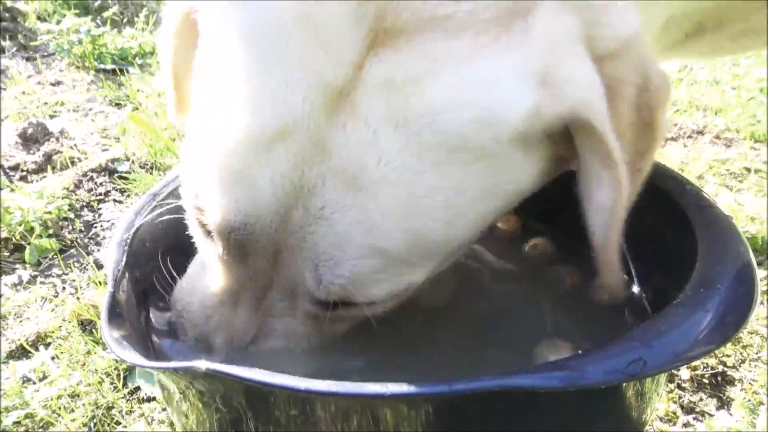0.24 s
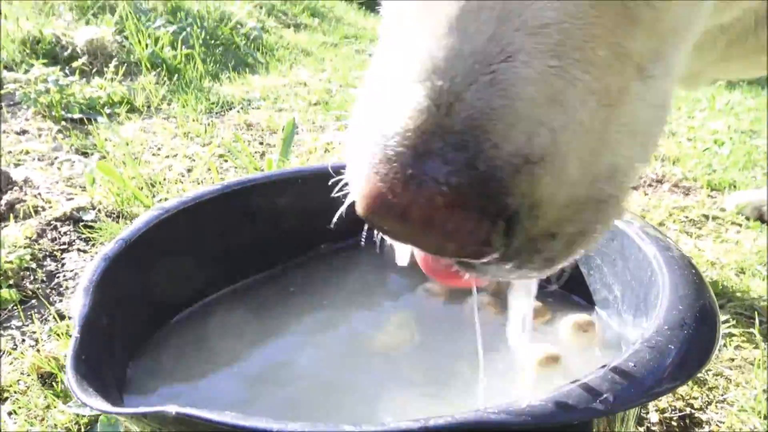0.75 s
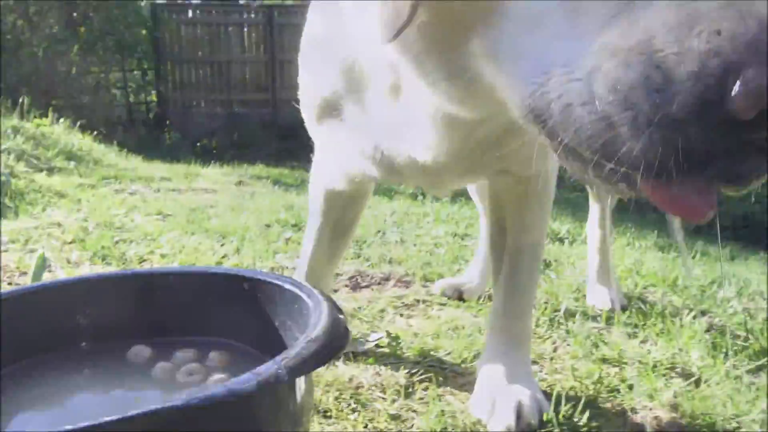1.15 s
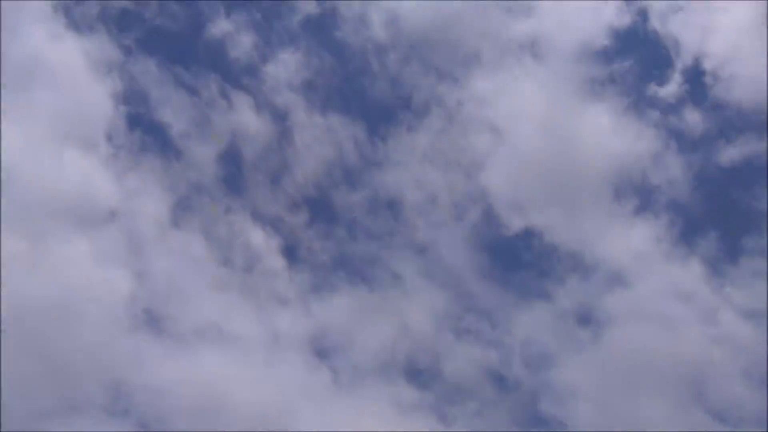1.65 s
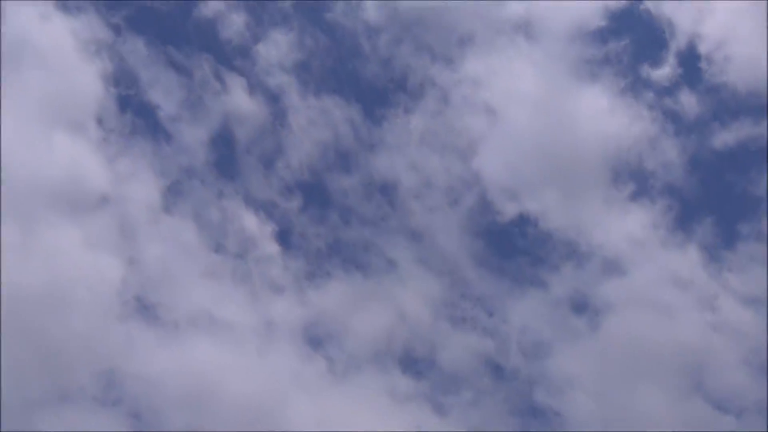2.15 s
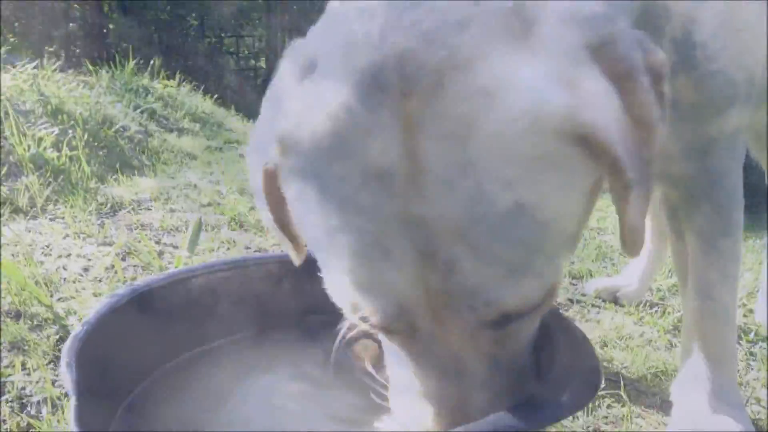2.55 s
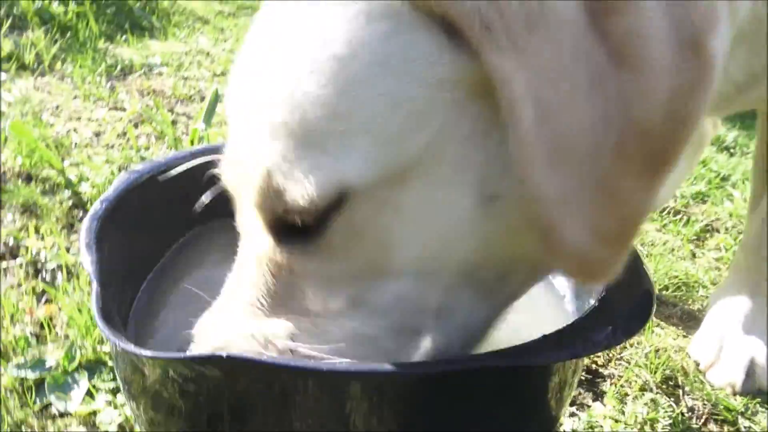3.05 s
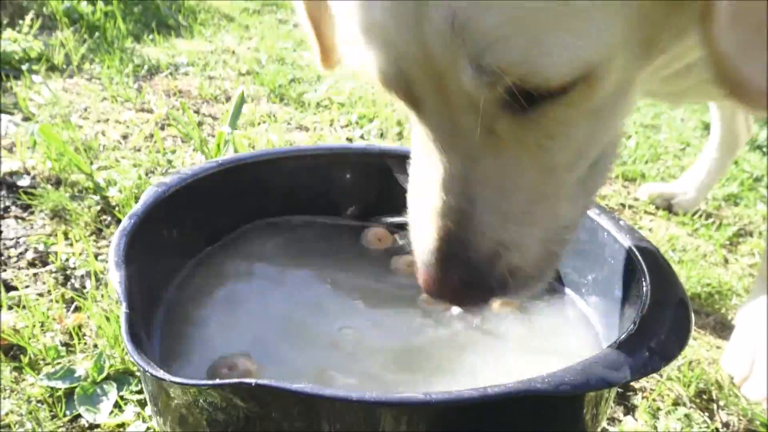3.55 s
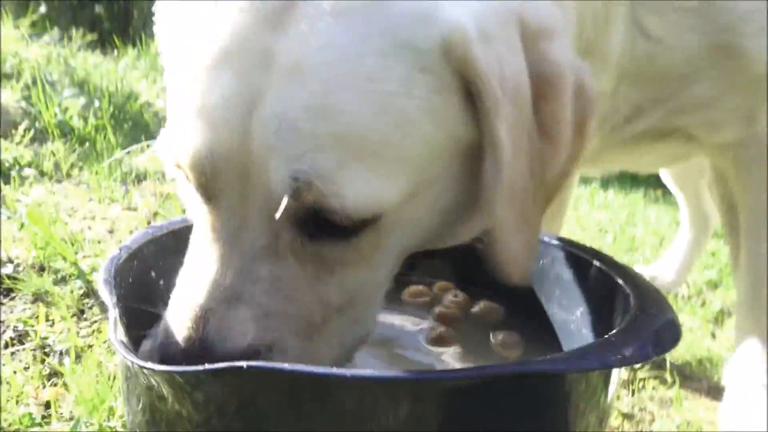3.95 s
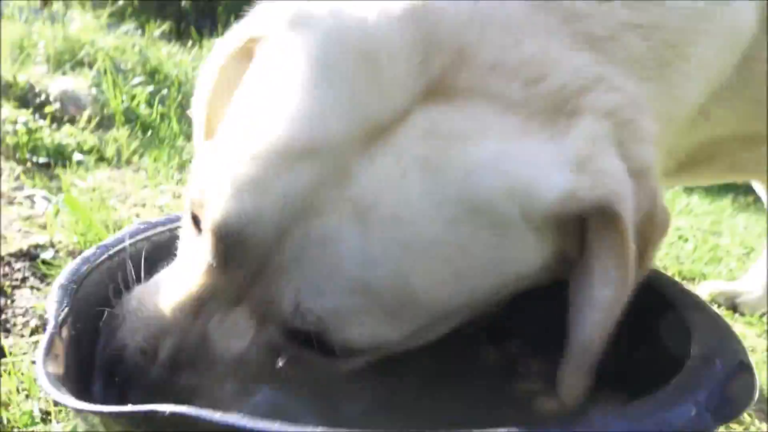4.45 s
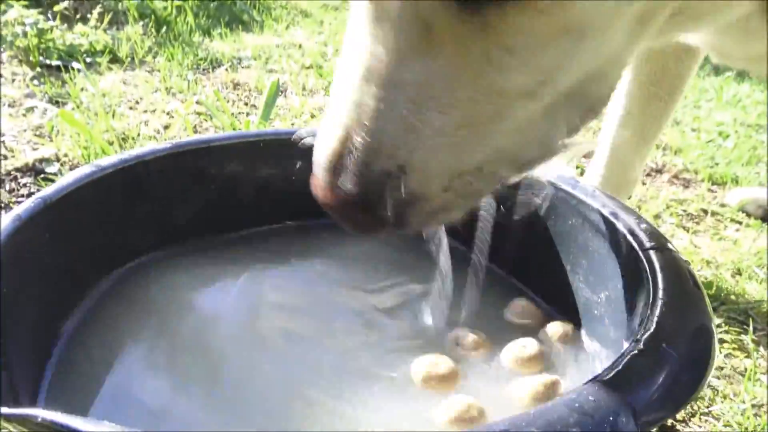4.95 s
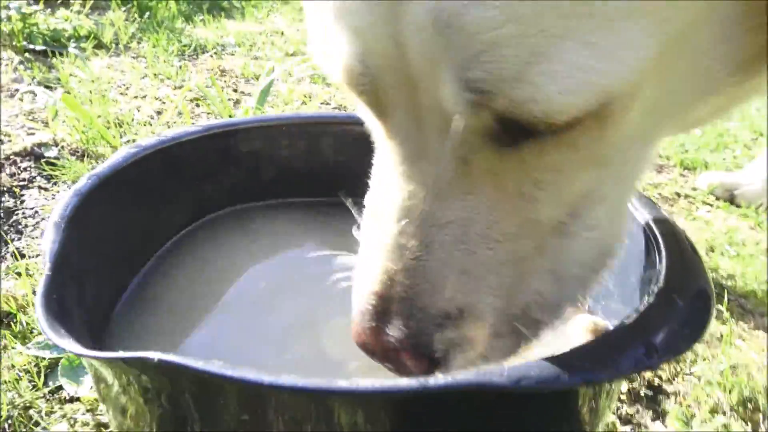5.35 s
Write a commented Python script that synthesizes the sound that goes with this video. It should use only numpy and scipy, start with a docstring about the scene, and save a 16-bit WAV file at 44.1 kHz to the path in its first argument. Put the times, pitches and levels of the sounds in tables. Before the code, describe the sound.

Fast sloppy dog lapping in a tub outdoors, bubbly splashes and bright drips, interrupted by a short dead-silent gap, faint birds behind.

```python
"""Quick wet laps, about seven a second: a dog laps and roots for floating treats in a plastic tub on a quiet lawn.
Each lap splashes as clouds of tiny bubbles and traps an air pocket that pings as a damped sine.
Drops ping as they fall back and squeezed air chirps upward; dull low thumps of wind or handling ring briefly.
Behind it are rumble, soft moving air and fizz as filtered noise, and faint high gliding bird whistles.
All sound stops for about 0.6 s partway through."""
import sys
import numpy as np
from scipy import signal
from scipy.fft import rfft, irfft, next_fast_len
from scipy.io import wavfile
from scipy.ndimage import uniform_filter1d, map_coordinates

SR = 44100
rng = np.random.default_rng(int(sys.argv[2]) if len(sys.argv) > 2 else 0)


def unload_wav(signal):
    """Save mono or channel-first audio to the path in sys.argv[1] as 16-bit WAV at rate SR, clipped to [-1, 1]."""
    wavfile.write(
        sys.argv[1],
        SR,
        np.round(np.clip(np.atleast_2d(signal).T, -1, 1) * 32767).astype(np.int16),
    )


N = 247401

# Laps: the tongue slaps the water and traps an air pocket, then the mouth smacks shut.
# Each row: start in seconds, nominal slap level in dB, spray share in dB (capped at 0), pocket start pitch in Hz,
# pocket peak in dB, pocket t60 in seconds, wait for the smack in seconds, nominal smack level in dB.
LAP_ROWS = [(0.0187, -45, 0.5, 2140, -22.5, 0.013, .019, -32),
            (.1345, -32.5, -5, 2214, -18.5, 0.013, 0.034, -33.5),
            (.278, -38.5, -2.5, 1640, -18, 0.003, 0.0058, -41.5),
            (0.351, -39.5, -4.5, 2240, -35, 0.0026, 0.014, -49),
            (.4705, -33, -4, 1850, -24, .012, 0.028, -40.5),
            (0.5857, -34.5, -1, 1670, -25, 0.016, 0.025, -44),
            (0.752, -40, -1, 3000, -59, 0.0035, 0.021, -40),
            (0.8753, -39, -3, 2450, -26, 0.0071, 0.017, -51),
            (1.0104, -38, -1, 1590, -18.5, 0.0035, 0.01, -40),
            (1.1476, -41.5, -2, 1750, -26, 0.0043, 0.022, -43),
            (1.28, -36.5, -3.5, 1910, -35, 0.024, 0.02, -48),
            (1.429, -46, -2.5, 3360, -28.5, 0.0045, .02, -52),
            (1.569, -43.5, -1, 3050, -34, 0.013, 0.03, -44.5),
            (1.705, -36.5, -2.5, 2814, -28, 0.0083, 0.021, -55.5),
            (2.3351, -41, -4.5, 2026, -14.5, 0.0087, 0.024, -52),
            (2.436, -42.5, -3, 1840, -30, 0.013, 0.065, -43.5),
            (2.563, -39, -0.5, 2840, -34, .005, 0.016, -39),
            (2.593, -37.5, -2.5, 1860, -28.5, 0.0076, 0.01, -34.5),
            (2.6827, -32.5, -2.5, 2240, -16, 0.0054, 0.032, -34),
            (2.812, -39, -1, 1900, -38, 0.011, .026, -35), (2.972, -36, -3, 2930, -32, .018, 0.027, -37.5),
            (3.114, -37, -5, 3430, -27, 0.0097, 0.023, -46.5),
            (3.146, -33, -3, 1510, -16.5, 0.004, 0.004, -58),
            (3.2476, -38, -5, 2560, -14.5, 0.0065, 0.027, -33.5),
            (3.384, -32.5, -5, 1600, -29.5, .012, 0.017, -41),
            (3.514, -34.5, -5.5, 1554, -28.5, 0.02, 0.017, -71),
            (3.643, -34.5, -3, 1850, -50, 0.0079, .052, -36),
            (3.822, -34.5, -3.5, 3100, -19.5, 0.0022, 0.0084, -45),
            (3.95, -37.5, -2.5, 2980, -27.5, 0.016, 0.045, -43),
            (4.1113, -39.5, -3, 1850, -30.5, .0064, .056, -52),
            (4.2247, -40, -10, 1560, -27.5, 0.015, 0.0403, -40),
            (4.348, -39, -14, 4120, -23.5, 0.0064, .047, -60),
            (4.416, -43, -0.5, 1690, -34, 0.014, 0.0027, -36.5),
            (4.505, -40, -2.5, 1920, -18, 0.0018, 0.016, -42.5),
            (4.6293, -41, -7, 5650, -13, 0.0011, 0.03, -32),
            (4.7361, -31.5, -2, 1700, -18.5, 0.0018, 0.035, -43),
            (4.86, -31.5, -2, 1820, -21, .008, 0.029, -40),
            (5.0223, -38, -2, 1600, -23.5, 0.007, 0.03, -32.5),
            (5.146, -34.5, -4, 1610, -21, 0.007, 0.028, -37.5),
            (5.215, -45, 1, 1840, -34, 0.014, 0.046, -47),
            (5.286, -41.5, -5.5, 1040, -31.5, 0.0082, 0.034, -38.5),
            (5.397, -40, 0, 2080, -38, 0.0073, 0.023, -38), (5.46, -36, -7.5, 2300, -33, .011, .023, -40.5),
            (5.519, -43, -2, 1740, -37, .03, 0.021, -41),
            (5.588, -39.5, -11, 3250, -26.5, .0033, 0.017, -49)]
SLAP_LAG_S = 0.00095  # the slap peaks just after the pocket closes


def amp(db):
    """Decibels to gain."""
    return 10 ** (np.asarray(db) / 20)


def unit(x):
    """Scale to rms 1."""
    return x / np.sqrt(np.mean(x ** 2) + 1e-20)


def add(track, start_s, sound):
    """Mix a sound into the track from start_s."""
    i = int(np.clip(round(start_s * SR), 0, N))
    track[i:i + len(sound)] += sound[:N - i]


def colour(x, points):
    """Filter by (Hz, dB) points joined on a log-frequency axis."""
    m = next_fast_len(N + SR // 4)
    hz, db = np.transpose(points)
    bin_hz = np.fft.rfftfreq(m, 1 / SR)
    gain = amp(np.interp(np.log(bin_hz + 1), np.log(hz), db))
    return irfft(rfft(x, m) * gain, m)[..., :N]


def noise(points):
    """Coloured noise of rms 1."""
    return unit(colour(rng.standard_normal(N), points))


def wander(knots_per_s, knots):
    """A smooth random curve through evenly spaced normal draws."""
    return map_coordinates(rng.standard_normal(knots), [np.arange(N) * knots_per_s / SR])


def droplets(rate_per_s, hz, octaves, cycles, scatter_db):
    """A dense cloud of tiny damped bubbles of random pitch and level, rms 1; each decays 60 dB in `cycles`."""
    count = int(rate_per_s * N / SR)
    when, pitch, size = rng.random((count, 3)).T
    bubble_hz = np.minimum(hz * 2 ** (octaves * (2 * pitch - 1)), .4 * SR)[:, None]
    k = np.arange(SR // 200)
    turns = bubble_hz * k / SR
    decay = np.exp(-np.log(1000) * turns / cycles)
    grains = amp(scatter_db * size)[:, None] * np.sin(2 * np.pi * turns) * decay
    index = (when * N).astype(int)[:, None] + k
    return unit(np.bincount(index.ravel(), grains.ravel(), N)[:N])


def ping(hz, t60_s, rise, onset_cycles):
    """A damped ring, envelope peak 1; its pitch climbs, as a bubble's does when it nears the surface."""
    t = np.arange(int(1.2 * t60_s * SR) + 8) / SR
    shape = amp(-60 * t / t60_s) * (1 - np.exp(-t * hz / onset_cycles))
    return shape / shape.max() * np.sin(2 * np.pi * hz * t * (1 + rise * t / t60_s))


def rings(rows, rise, onset_cycles):
    """Every row (s, Hz, dB, t60 s) is a damped ring: mostly high for bubbles, low for thumps."""
    out = np.zeros(N)
    for start_s, hz, db, t60_s in rows:
        add(out, start_s, amp(db) * ping(hz, t60_s, rise, onset_cycles))
    return out


def glide(length_s, start_hz, end_hz):
    """A short tone that swells and fades as its pitch slides."""
    n = int(length_s * SR)
    hz = np.geomspace(start_hz, end_hz, n)
    return np.sqrt(2 * np.hanning(n)) * np.sin(2 * np.pi * np.cumsum(hz) / SR)


def splashes():
    """Touch, slap and smack are short swells of small bubbles: a deep gurgle, a coarse slosh and a fine spray."""
    # Filter curves. Each row: frequency in Hz, gain in dB before scaling to rms 1.
    slosh_curve = [(300, -12.5), (700, -7), (1200, -12.5), (1750, 12.5), (3000, 11), (4500, 2.5),
                   (6500, -9), (12000, -36)]
    spray_curve = [(2500, -37), (4500, -10.5), (6600, -6), (8500, -6), (11000, -7), (15000, -7.5)]
    touch_lead_s, touch_s, touch_db = 0.0054, 0.0025, -7  # the tongue's tip touches first; level re slap
    slap_s, smack_s = 0.01, 0.0097  # swell time scales; slap_s holds at the typical ring
    typical_ring_s, stretch_power = 0.021, .1  # a longer-ringing lap splashes longer
    smack_spray_db = -1  # re the slap's spray share
    clumps_per_s, clump_db = 210, 2.5  # bubbles burst in uneven clumps
    deep, coarse, fine = np.zeros((3, N))
    for start_s, slap_db, spray_db, _, _, ring_s, wait_s, smack_db in LAP_ROWS:
        stretched_s = slap_s * (ring_s / typical_ring_s) ** stretch_power
        touch = (start_s - touch_lead_s, slap_db + touch_db, touch_s, spray_db)
        slap = (start_s + SLAP_LAG_S, slap_db, stretched_s, spray_db)
        smack = (start_s + wait_s, smack_db, smack_s, spray_db + smack_spray_db)
        for peak_s, db, length_s, treble_db in (touch, slap, smack):
            t = np.arange(-int(2 * length_s * SR), int(2 * length_s * SR)) / SR
            steepness = np.where(t < 0, 3.4, 2.6)  # swells faster than it dies
            power = amp(db) ** 2 / np.cosh(steepness * t / length_s) ** 2
            share = min(amp(treble_db) ** 2, 1)
            sunk = .5 / (1 + share / 0.014)  # little spray: more of the splash is under water, with larger bubbles
            add(deep, peak_s + t[0], power * sunk)
            add(coarse, peak_s + t[0], power * (1 - share) * (1 - sunk))
            add(fine, peak_s + t[0], power * share)
    gurgle = droplets(rate_per_s=1300, hz=1080, octaves=0.46, cycles=9.1, scatter_db=39)
    slosh_cloud = droplets(rate_per_s=3500, hz=1972, octaves=1.65, cycles=15, scatter_db=42)
    spray_cloud = droplets(rate_per_s=3000, hz=8000, octaves=1., cycles=24, scatter_db=36)
    slosh = unit(colour(slosh_cloud, slosh_curve))
    spray = unit(colour(spray_cloud, spray_curve))
    clumps = unit(amp(clump_db * wander(clumps_per_s, N // 20)))
    mix = amp(3.5) * np.sqrt(deep) * gurgle
    mix += amp(-0.6) * np.sqrt(coarse) * slosh
    mix += amp(0.43) * np.sqrt(fine) * spray
    return clumps * mix


def bubbles():
    """Each lap's air pocket, the smaller bubble that splits off it, loud drops and stray drips ring as damped sines."""
    # Loudest drops falling from the muzzle. Each row: start in seconds, start pitch in Hz, peak in dB.
    loud_drops = [(.0354, 2360, -23), (0.0394, 7640, -26), (.0396, 11700, -22), (.0417, 3300, -27.5),
                  (.1096, 2970, -28.5), (.137, 2310, -19.5), (.1389, 5570, -22), (.1713, 3080, -21),
                  (.183, 970, -30), (.1944, 1810, -27), (.2398, 2660, -26.5), (.2401, 6470, -23),
                  (.2835, 2530, -19.5), (0.2835, 12400, -29), (.3532, 7140, -25), (.4756, 4750, -23),
                  (.4773, 3070, -25.5), (0.5185, 7500, -29), (.55, 1780, -31), (.624, 7340, -30.5),
                  (.7581, 6200, -20.5), (.7725, 5750, -22), (1.1606, 2310, -29), (1.168, 2650, -35.5),
                  (1.281, 6050, -26.5), (1.297, 2580, -36.5), (1.432, 8530, -28), (1.5962, 2700, -29.5),
                  (2.3298, 6240, -26.5), (2.4852, 2570, -37), (2.5107, 3300, -28), (2.5814, 3850, -22),
                  (2.6021, 9540, -23), (2.6123, 3900, -27), (2.7066, 3930, -23), (2.711, 3600, -24.5),
                  (2.7732, 7040, -27.5), (2.8202, 4080, -25.5), (2.8416, 5370, -27.5), (2.862, 5100, -37.5),
                  (3.0255, 1750, -26.5), (3.0325, 6900, -24.5), (3.2466, 5770, -24), (3.252, 3400, -21),
                  (3.2778, 1520, -24.5), (3.2844, 890, -28.5), (3.2856, 4740, -23.5), (3.3053, 3400, -25),
                  (3.4533, 6830, -31), (3.8048, 2630, -37.5), (3.8825, 3800, -33.5), (4.0149, 5740, -35),
                  (4.1138, 4060, -18.5), (4.21, 3170, -34), (4.261, 1230, -34.5), (4.278, 4640, -31.5),
                  (4.365, 890, -36.5), (4.392, 1180, -44), (4.4944, 10400, -28.5), (4.5042, 3890, -23),
                  (4.5778, 2680, -37.5), (4.63, 4600, -24.5), (4.6453, 800, -29), (4.651, 1800, -27),
                  (4.6622, 6100, -23), (4.7331, 6360, -12.5), (4.744, 4800, -25.5), (4.7733, 7550, -32),
                  (4.8031, 7300, -26), (4.899, 1930, -33.5), (4.9668, 7260, -27), (5.0599, 1890, -23.5),
                  (5.0629, 12200, -28.5), (5.0985, 1600, -23.5), (5.2247, 4200, -29.5),
                  (5.2599, 1720, -21.5), (5.2915, 5900, -27.5), (5.3184, 2620, -29.5), (5.3854, 8000, -29),
                  (5.4245, 9000, -30), (5.4861, 2080, -19)]
    split_ratio, split_db, split_t60_s = 1.863, 5.5, 0.0032  # pitch re pocket, peak re slap level, ring
    drop_t60_s, drop_hz, shortening_power = 0.0062, 2000, .4  # ring at drop_hz; smaller bubbles ring shorter
    drips_per_s, drip_db, drip_scatter_db = 10, -44.5, 11
    drip_hz, drip_octaves = 4200, 1.12
    pockets = [(s, hz, db, t60_s) for s, _, _, hz, db, t60_s, _, _ in LAP_ROWS]
    splits = [(s + SLAP_LAG_S, hz * split_ratio, slap_db + split_db, split_t60_s)
              for s, slap_db, _, hz, *_ in LAP_ROWS]
    drips = []
    for when, pitch, size in rng.random((int(drips_per_s * N / SR), 3)):
        hz = drip_hz * 2 ** (drip_octaves * (2 * pitch - 1))
        drips.append((when * N / SR, hz, drip_db + drip_scatter_db * (2 * size - 1)))
    drops = [(s, hz, db, drop_t60_s * (drop_hz / hz) ** shortening_power)
             for s, hz, db in loud_drops + drips]
    return rings(pockets + splits + drops, rise=0.028, onset_cycles=1.0)


def squelches():
    """A shrinking pocket of air, squeezed out by the tongue, chirps steeply upward."""
    # Each row: start in seconds, length in seconds, start pitch in Hz, nominal level in dB.
    squelch_rows = [(.187, 0.015, 1710, -39.5), (0.4, .011, 967, -43), (.475, 0.013, 1280, -37),
                    (0.595, 0.021, 1296, -42), (1.029, 0.011, 4170, -39.5), (2.512, 0.0093, 3140, -41),
                    (2.642, 0.0089, 2800, -38.5), (2.698, 0.015, 3210, -34), (4.647, 0.015, 1537, -48),
                    (4.755, .0088, 3700, -51)]
    pitch_ratio = 1.55  # end over start
    out = np.zeros(N)
    for start_s, length_s, hz, db in squelch_rows:
        add(out, start_s, amp(db) * glide(length_s, hz, hz * pitch_ratio))
    return out


def fallback(splashing, settle_s):
    """Thrown water patters back: a droplet cloud follows the splash power with an exponential tail."""
    t = np.arange(SR // 4) / SR
    fade = np.exp(-t / settle_s)
    stirred = np.abs(signal.fftconvolve(splashing ** 2, fade / fade.sum())[:N])
    patter = droplets(rate_per_s=500, hz=4800, octaves=1.65, cycles=24, scatter_db=24)
    return np.sqrt(stirred) * unit(colour(patter, [(1500, -7), (4000, 3), (13000, 2.5)]))


def thumps():
    """Dull low thumps of wind or handling, as quickly damped rings."""
    # Each row: start in seconds, start pitch in Hz, peak in dB.
    thump_rows = [(0.041, 267, -28), (.175, 117.7, -33), (0.1831, 357, -34.5), (0.631, 252, -36),
                  (0.8128, 430, -33), (0.8408, 284, -36), (0.964, 224, -40), (1.3159, 403, -29.5),
                  (1.34, 283, -28.5), (1.3653, 280, -29), (1.3671, 570, -28.5), (1.4033, 334, -32),
                  (1.4105, 120, -34.5), (1.667, 276, -35), (2.694, 416, -30), (2.6989, 184, -31),
                  (5.2867, 540, -32.5)]
    t60_s = 0.013
    return rings([(s, hz, db, t60_s) for s, hz, db in thump_rows], rise=0.043, onset_cycles=0.69)


def short_echo(x, t60_s, delay_s):
    """The tub's walls and the ground return a short, dense echo: decaying noise as impulse response."""
    t = np.arange(SR // 8) / SR
    tail = rng.standard_normal(len(t)) * np.exp(-np.log(1000) * t / t60_s) * (t > delay_s)
    return signal.fftconvolve(x, tail / np.linalg.norm(tail))[:N]


def bird():
    """Thin gliding whistles, blurred by distance: slow noise modulates their level."""
    # Each row: start in seconds, length in seconds, start pitch in Hz, end pitch in Hz, nominal level in dB.
    whistle_rows = [(1.332, .07, 7150, 6800, -62), (1.44, 0.088, 8500, 7550, -60.5),
                    (1.623, 0.19, 5660, 6760, -56.5), (2.29, 0.33, 6870, 6600, -66),
                    (3.725, 0.11, 5140, 6160, -58), (3.798, 0.11, 7200, 7200, -59),
                    (4, 0.076, 8600, 8200, -60), (5.154, 0.052, 6900, 6520, -48.5),
                    (5.207, 0.1, 5340, 5960, -56.5), (5.275, 0.11, 7860, 7470, -51),
                    (5.437, 0.096, 7700, 7900, -58)]
    out = np.zeros(N)
    for start_s, length_s, start_hz, end_hz, db in whistle_rows:
        add(out, start_s, amp(db) * glide(length_s, start_hz, end_hz))
    return out * unit(uniform_filter1d(rng.standard_normal(N), size=150))


def background():
    """Uneven low rumble, moving air, and the fizz of stirred water over a faint hiss."""
    # Level curves before and after the silence.
    # Each row: time in seconds, then rumble, air and fizz in dB before the layer gains.
    levels_before = [(0.0, -53, -53.5, -49.5), (0.11, -59.5, -54.5, -49), (0.444, -68, -51, -51),
                     (0.63, -60, -55.5, -60), (0.812, -57.5, -56.5, -55.5), (1.188, -62, -53.5, -47),
                     (1.46, -53.5, -53, -52.5), (1.52, -58, -53, -51)]
    levels_after = [(2.52, -56, -53.5, -50), (2.67, -55.5, -52, -48.5), (2.8, -56.5, -55, -48.5),
                    (2.92, -55, -52.5, -51), (3.06, -62.5, -53, -49.5), (3.21, -77, -58, -56),
                    (3.47, -67.5, -60.5, -53.5), (3.78, -64, -58.5, -52), (4.29, -72, -54, -51),
                    (4.44, -74, -52.5, -50), (4.73, -73.5, -54.5, -47), (5.06, -63, -53, -51),
                    (5.31, -67.5, -55, -47), (5.6, -70, -54, -48.5)]
    # Spectra. Each row: frequency in Hz, relative density in dB.
    rumble_curve = [(20, -11), (40, 0.5), (80, 9.5), (130, 9.5), (200, 9.5), (300, 3.5), (500, -23)]
    breeze_curve = [(110, -24.5), (200, -6.5), (300, 1.5), (650, 2), (1000, -1), (1400, -8.5), (2500, -11),
                    (5000, -51)]
    fizz_curve = [(800, -24.5), (1400, 2.5), (1800, 4), (2400, 1.5), (3100, 5), (4000, 1), (7500, -5),
                  (9000, -6.5), (11500, -8), (14500, -5.5), (16000, -10)]
    rumble_db, air_db, hiss_db, prickle_db = 3, 1, -8.5, -8  # layer gains over the level curves
    times_s, *columns = np.transpose(np.vstack([levels_before, levels_after]))
    t = np.arange(N) / SR
    rumble, air, fizz = [amp(np.interp(t, times_s, db)) for db in columns]
    flutter = amp(3.5 * wander(25, N // 1000))
    prickle_cloud = droplets(rate_per_s=900, hz=4500, octaves=1.7, cycles=12, scatter_db=26)
    prickle = unit(colour(prickle_cloud, fizz_curve))
    low = amp(rumble_db) * rumble * flutter * noise(rumble_curve)
    moving_air = amp(air_db) * air * noise(breeze_curve)
    stirred_water = fizz * (amp(hiss_db) * noise(fizz_curve) + amp(prickle_db) * prickle)
    return low + moving_air + stirred_water


def scene():
    """Nearly mono: the side signal holds only a filtered echo and a second, filtered background."""
    # Side filters. Each row: frequency in Hz, gain in dB.
    echo_width = [(250, -22), (600, -18.5), (1500, -34), (5000, -24.5), (14000, -30.5)]
    air_width = [(50, -29), (250, -19), (600, -16.5), (1500, -31), (5000, -35), (14000, -30.5)]
    splashing = splashes() + squelches()
    patter = amp(-12) * fallback(splashing, settle_s=0.036)
    close = splashing + patter + bubbles() + thumps()
    echo = amp(-15.0) * short_echo(close, t60_s=0.049, delay_s=0.0011)
    mid = close + echo + background() + bird()
    side = colour(short_echo(close, t60_s=.012, delay_s=0), echo_width) + colour(background(), air_width)
    return np.array([mid + side, mid - side])


def record(dry):
    """Cut the deep bass, mute the pause, and roll off steeply at the top."""
    # Start and end of the silence in seconds.
    pause_s = (1.711, 2.309)
    low_cut_hz, top_hz = 56, 16100
    t = np.arange(N) / SR
    running = (t < pause_s[0]) | (t > pause_s[1])
    thinned = signal.sosfilt(signal.butter(2, low_cut_hz, "highpass", fs=SR, output="sos"), dry)
    m = next_fast_len(N + SR // 4)
    roll_off = 1 / np.sqrt(1 + (np.fft.rfftfreq(m, 1 / SR) / top_hz) ** 200)
    return irfft(rfft(thinned * running, m) * roll_off, m)[:, :N]


dry = scene()
out = record(dry)
unload_wav(out)
```